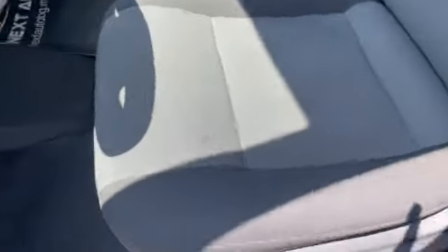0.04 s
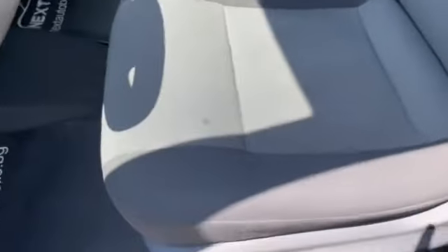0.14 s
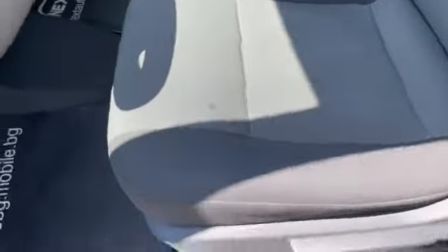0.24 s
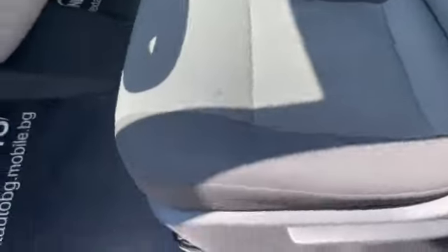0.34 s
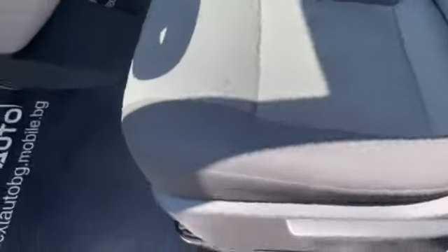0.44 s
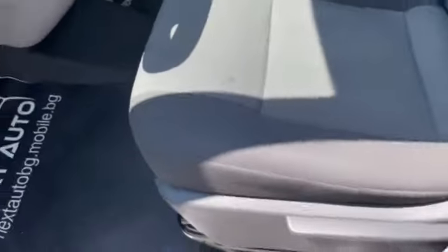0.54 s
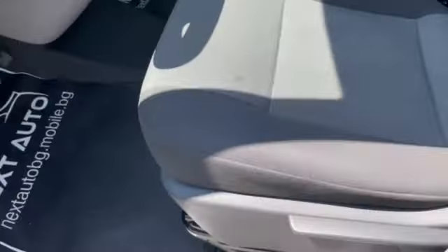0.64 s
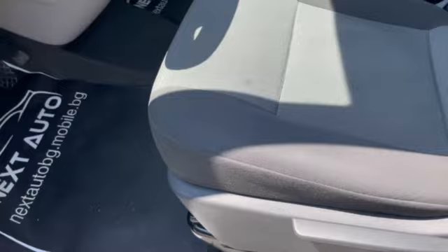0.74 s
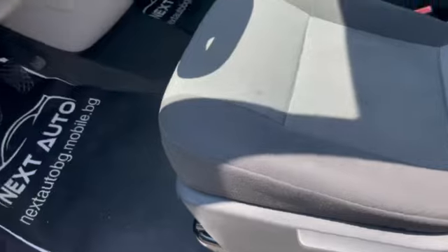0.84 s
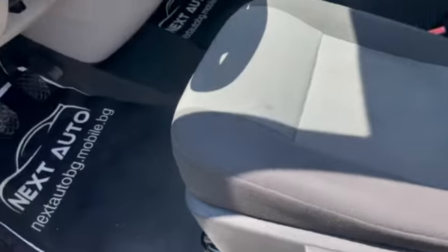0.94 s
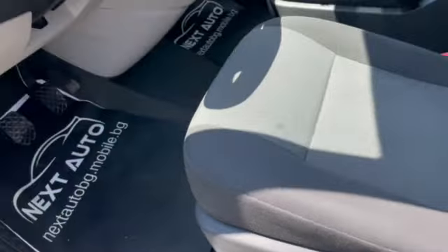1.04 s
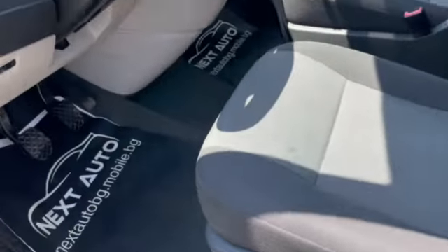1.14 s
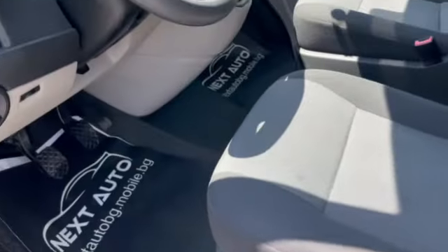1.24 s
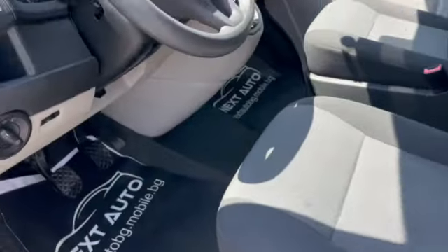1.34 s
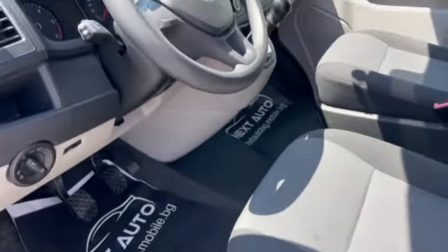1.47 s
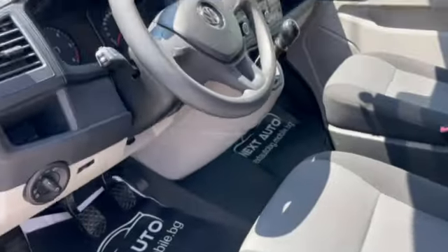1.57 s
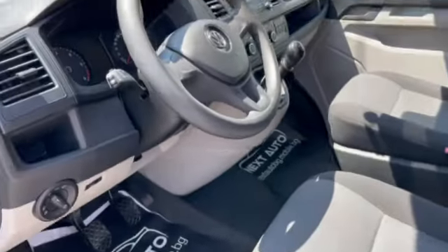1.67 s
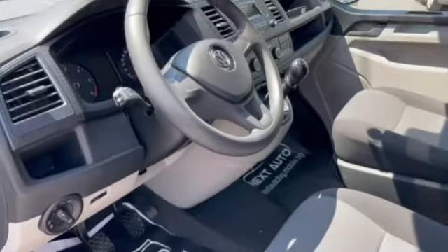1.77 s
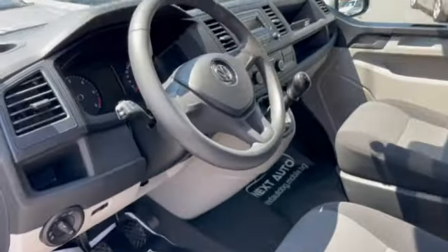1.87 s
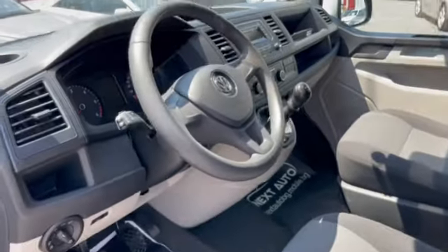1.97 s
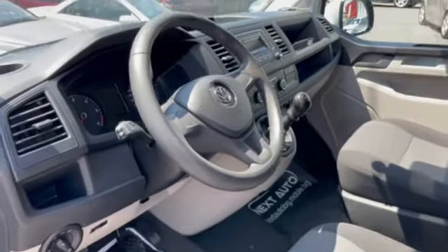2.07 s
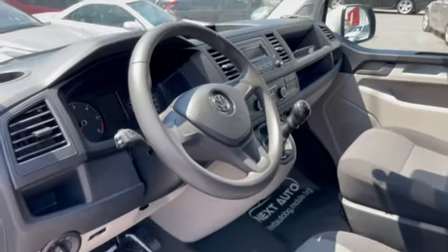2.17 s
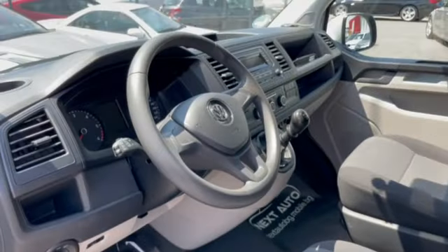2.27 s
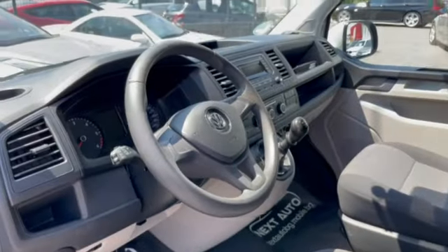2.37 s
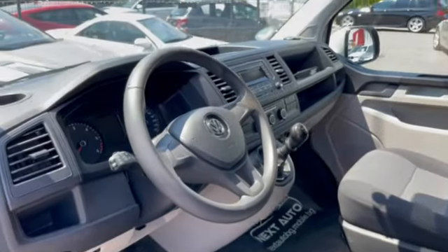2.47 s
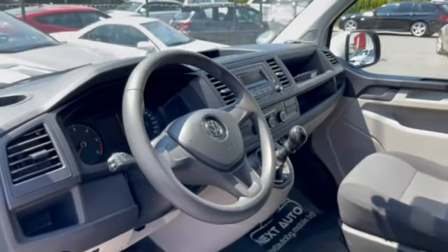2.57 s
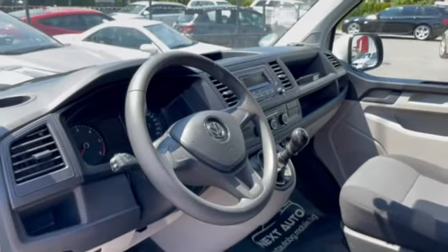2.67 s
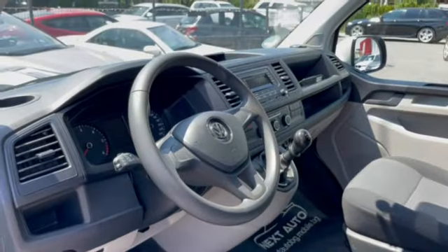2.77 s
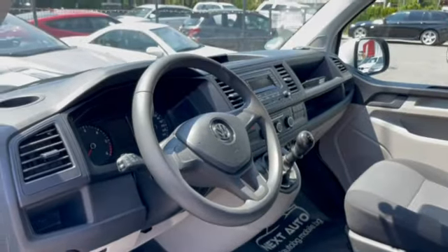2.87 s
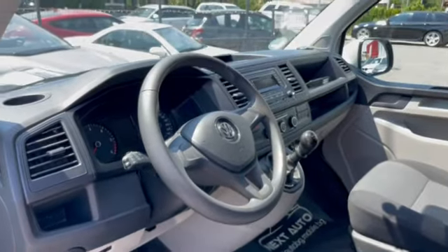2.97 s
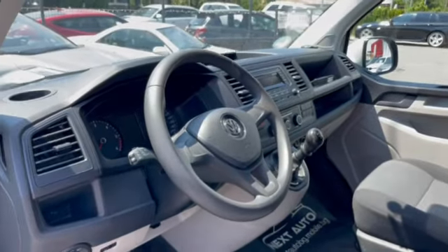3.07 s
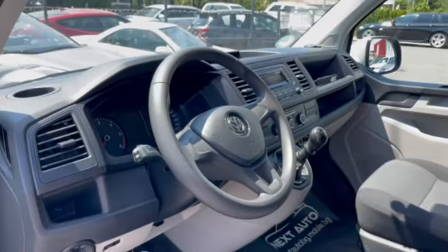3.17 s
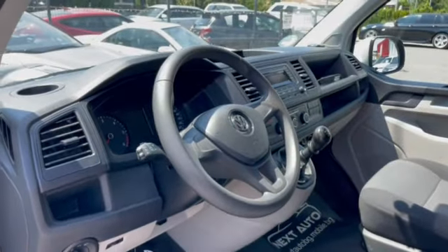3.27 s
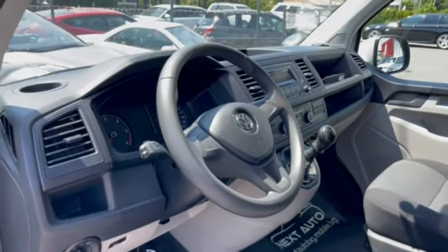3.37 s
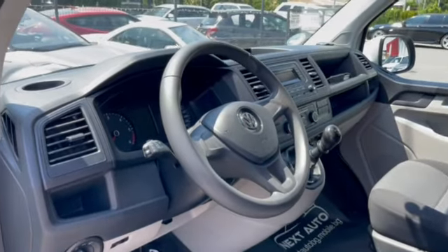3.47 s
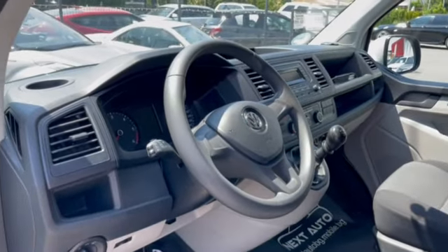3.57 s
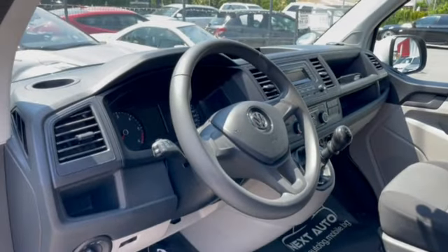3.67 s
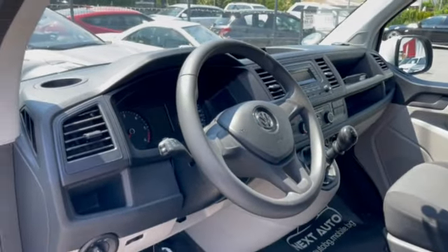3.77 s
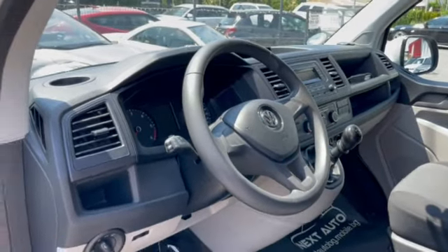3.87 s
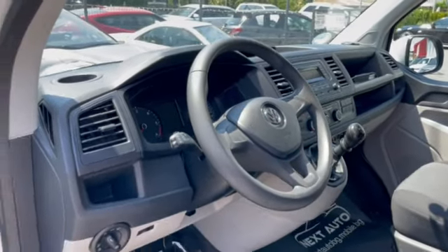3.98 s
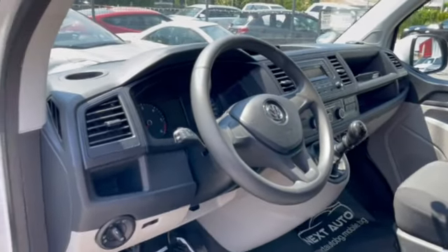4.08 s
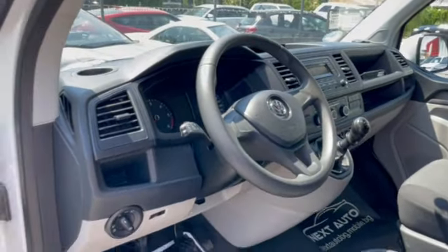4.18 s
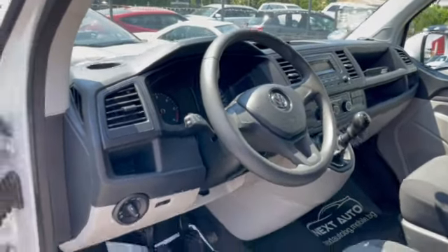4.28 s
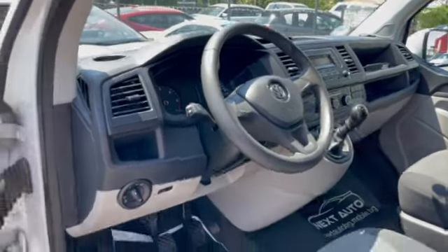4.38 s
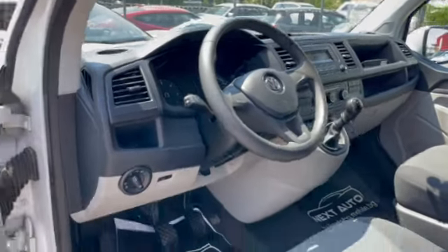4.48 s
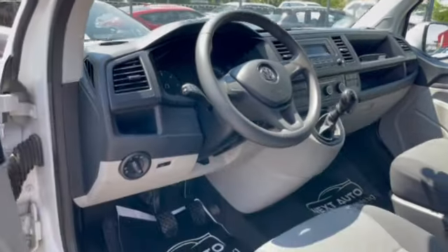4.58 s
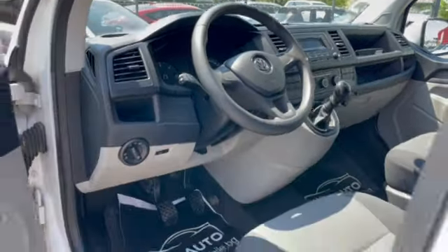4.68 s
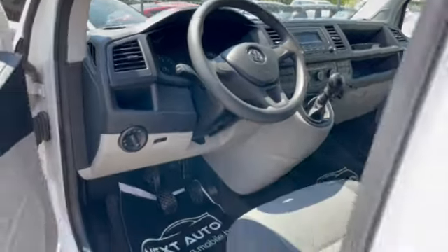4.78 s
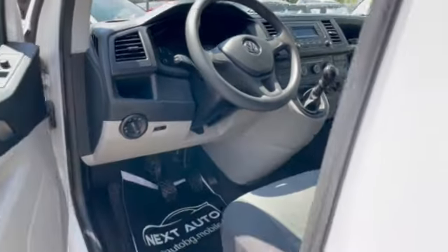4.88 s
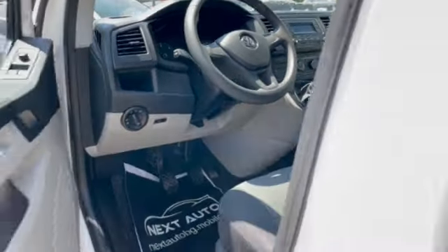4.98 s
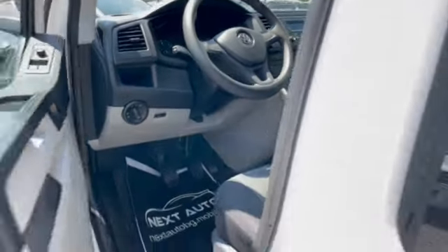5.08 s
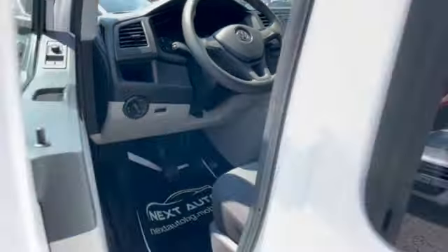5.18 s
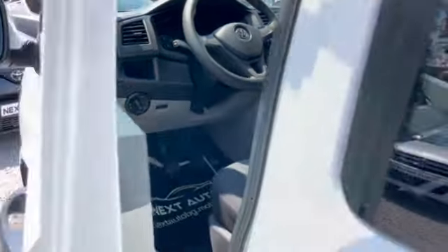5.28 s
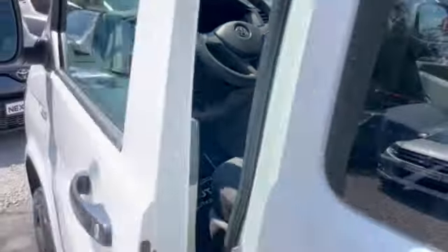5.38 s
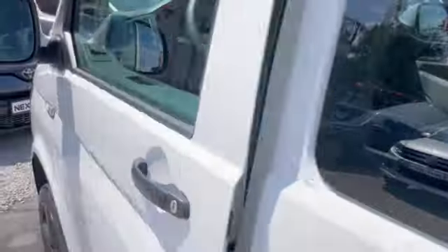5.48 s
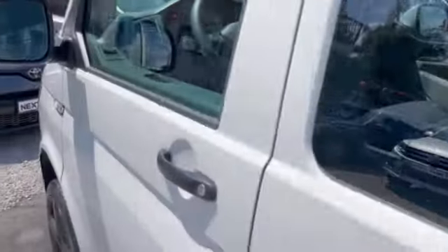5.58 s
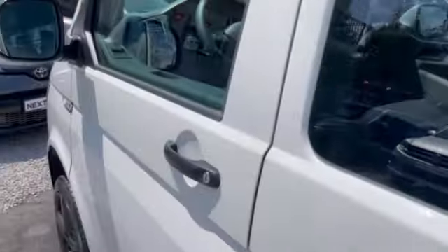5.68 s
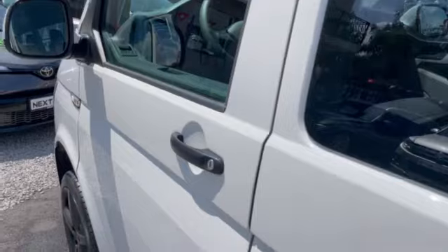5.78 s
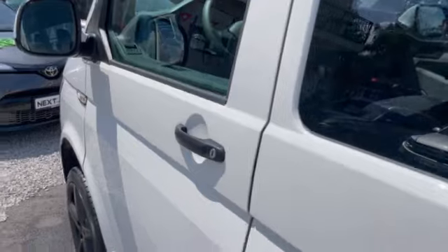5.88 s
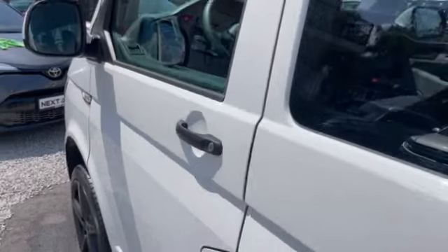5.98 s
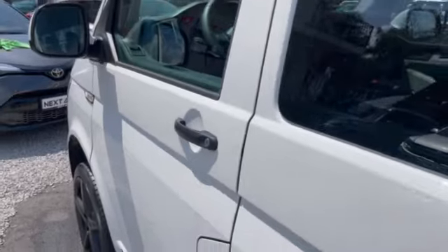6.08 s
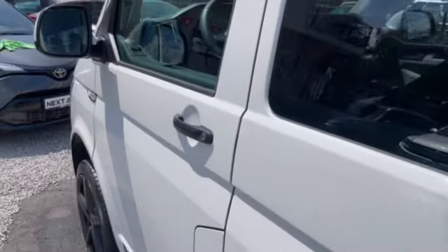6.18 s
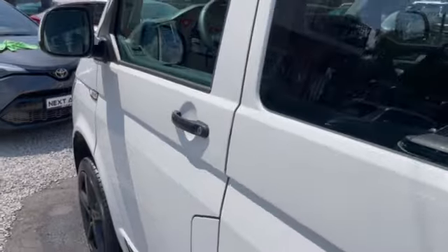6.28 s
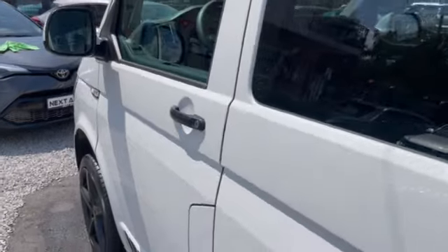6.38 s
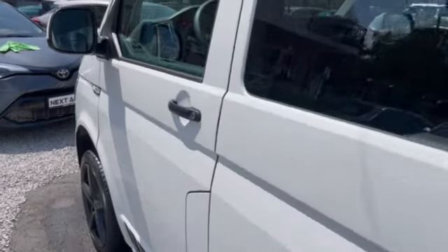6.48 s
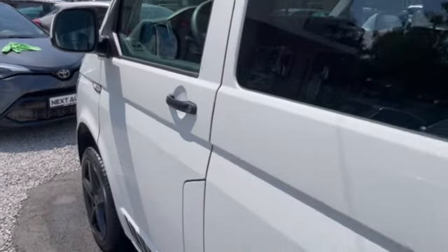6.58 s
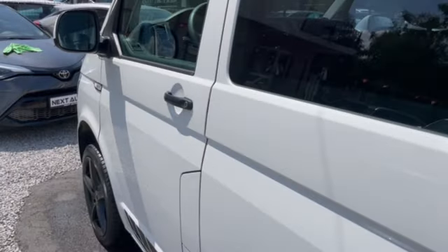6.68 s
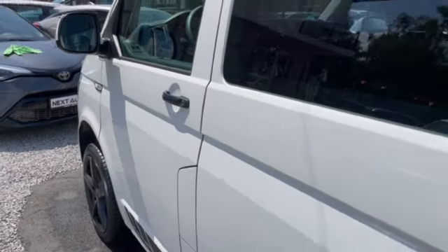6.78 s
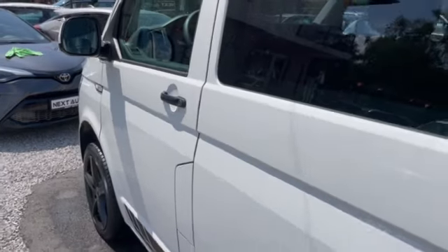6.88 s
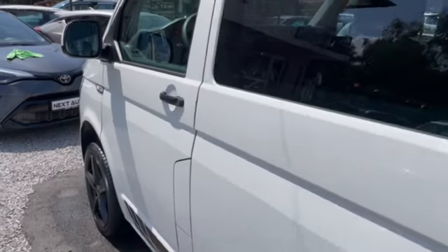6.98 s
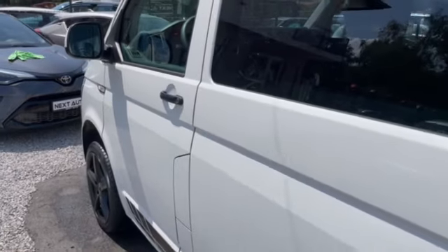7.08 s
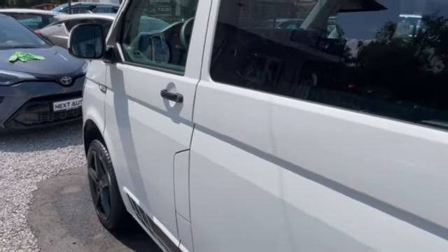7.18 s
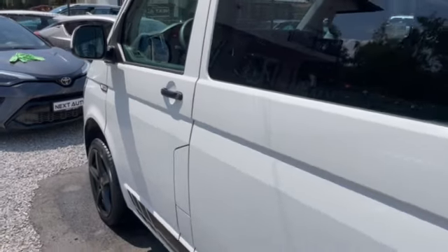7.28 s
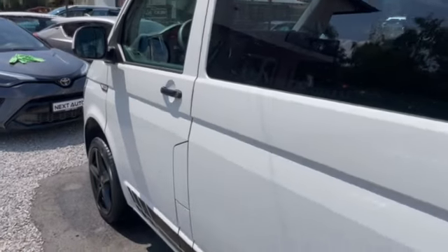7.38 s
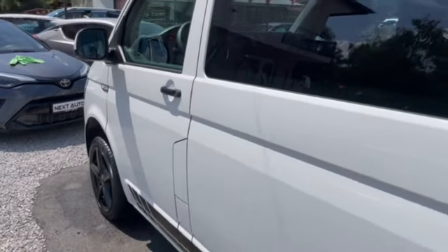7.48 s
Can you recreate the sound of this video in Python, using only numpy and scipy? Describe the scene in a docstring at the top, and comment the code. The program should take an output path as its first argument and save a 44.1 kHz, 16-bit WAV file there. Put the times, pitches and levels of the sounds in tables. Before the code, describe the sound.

Several seconds of quiet outdoor background, with distant road noise, a low engine hum and small dry handling taps. Wind bumps thicken on the microphone before a nearby van door shuts hard, metallic and hollow, its trim rattling briefly and the cabin booming. A crunchy step back on gravel follows, then a softer one, amid low puffing rumble. Open air, almost no echo.

```python
"""A van's driver's door slams on a gravel lot: latch, seals and one rebound, as rung modes and dying noise.
Two steps back scuff the gravel in showers of tiny pings; small knocks are damped rings with dry clicks.
Moving air buffets the microphone of a hand-held camera as low noise with swinging puffs.
Behind lie distant traffic, made of shaped noise, and two humming engines, made of sines."""
import sys
import numpy as np
from scipy import signal
from scipy.fft import rfft, irfft, next_fast_len
from scipy.io import wavfile
from scipy.ndimage import map_coordinates

SR = 44100
rng = np.random.default_rng(int(sys.argv[2]) if len(sys.argv) > 2 else 0)


def wav_record(signal):
    """Record a signal, one row per channel, as 16-bit PCM in the file named by sys.argv[1]."""
    frames = np.transpose(np.atleast_2d(signal))
    bounded = np.clip(frames, -1, 1)
    # unit amplitude maps onto the largest positive 16-bit level
    quanta = np.round(bounded * 32767).astype(np.int16)
    wavfile.write(sys.argv[1], SR, quanta)


N = 332073
LEFT_RIGHT = np.array([[0.5], [-0.5]])  # shares of a left-right difference


def amp(db):
    """Decibels to gain."""
    return np.exp(np.asarray(db) * (np.log(10) / 20))


def unit(x):
    """Scale to rms 1."""
    return x / np.sqrt(np.mean(x ** 2) + 1e-20)


def along(points, hz):
    """Read (frequency, value) points on a log frequency axis."""
    f, v = np.transpose(points)
    return np.interp(np.log(hz + 1), np.log(f + 1), v)


def curves(rows):
    """One value per sample for each column after the time."""
    s, *cols = np.transpose(rows)
    return [np.interp(np.arange(N) / SR, s, c) for c in cols]


def wobble(rate):
    """A smooth random curve with rate knots a second."""
    coarse = np.arange(0, N, 20)
    knots = rng.standard_normal(512)
    curve = map_coordinates(knots, [coarse * rate / SR], mode="wrap")
    return np.interp(np.arange(N), coarse, curve)


def filtered(x, response):
    """Multiply the spectrum of x by a response of frequency."""
    n = x.shape[-1]
    m = next_fast_len(n + 4096)
    return irfft(rfft(x, m) * response(np.fft.rfftfreq(m, 1 / SR)), m)[..., :n]


def add(track, s, sound):
    """Mix a sound into a track at time s."""
    start = round(s * SR)
    track[..., start:start + sound.shape[-1]] += sound[..., :N - start]


def widen(pair, side_db):
    """Two unrelated signals, as middle and side, become left and right with rms 1."""
    side = amp(side_db) * pair[1]
    return unit(np.array([pair[0] + side, pair[0] - side]))


def rush(spectrum, alike):
    """Steady stereo noise of rms 1 with a given left-right likeness."""
    def colour(hz):
        turn = np.arccos(np.clip(along(alike, hz), -1, 1)) / 2
        return amp(along(spectrum, hz)) * [np.cos(turn), np.sin(turn)]
    return widen(filtered(rng.standard_normal((2, N)), colour), 0)


def dying(noise, t60s):
    """Each frequency of a noise dies at its own speed."""
    hz, t, z = signal.stft(noise, SR, nperseg=128)
    decay = amp(-60 * t / along(t60s, hz)[:, None])
    return signal.istft(z * decay, SR, nperseg=128)[1][:, :noise.shape[-1]]


def ring(modes, t, scatter_db):
    """Sum damped modes, struck at slightly new strengths each time."""
    hz, db, t60 = np.transpose(modes)[:, :, None]
    sign = (-1) ** np.arange(len(hz))[:, None]
    level_db = db + scatter_db * rng.standard_normal(hz.shape) - 60 * t / t60
    return np.sum(sign * amp(level_db) * np.sin(2 * np.pi * hz * t), axis=0)


def pulse(colour):
    """One sharp causal pulse of peak 1 with a given spectrum."""
    size = 4096
    magnitude = np.maximum(colour(np.fft.rfftfreq(size, 1 / SR)), 1e-6)
    # folding the cepstrum forward gives minimum phase: the energy comes first
    cepstrum = irfft(np.log(magnitude))
    cepstrum[1:size // 2] *= 2
    cepstrum[size // 2 + 1:] = 0
    wave = irfft(np.exp(rfft(cepstrum)))
    return wave / np.abs(wave).max()


def smear(x, t60_s):
    """Two unrelated trails of dense, quickly dying copies of a sound."""
    trail = rng.standard_normal((2, len(x))) * amp(-60 * np.arange(len(x)) / SR / t60_s)
    return signal.fftconvolve(x[None], trail / np.linalg.norm(trail[0]), axes=1)[:, :len(x)]


# door contacts: (time [s], clatter drive [dB], clatter tilt [dB per octave], latch ring [dB],
# panel ring [dB], frame clonk [dB], lock plate [dB])
CONTACTS = [(5.529, -41, -2, -38.5, -49, -39, -42), (5.5391, -12.5, -4, -4, -21.5, -12, -33),
            (5.5446, -15.5, 0, -16.5, -28.5, -6, -19), (5.5549, -10.5, 0, -18, -25.5, -21.5, -16),
            (5.5606, -25, -3, -28.5, -21.5, -6, -25.5), (5.5656, -23, 9.5, -23.5, -31.5, -28, -30),
            (5.5695, -16.5, -3, -25, -26, -29.5, -23.5), (5.588, -16.5, 5, -28, -37, -30.5, -31),
            (5.5917, -17.5, -5.5, -22, -23.5, 2, -10), (5.6002, -23, -6.5, -41, -32, -13.5, -22),
            (5.638, -40.5, 4, -43, -47, -36.5, -43), (5.6443, -25.5, -0.5, -28, -28, -5.5, -28.5),
            (5.649, -32, -5.5, -43.5, -40, -18, -37)]
# loose trim and lock parts: (frequency [Hz], density [dB per Hz])
CLATTER_SPECTRUM = [(150, -23), (280, 4), (420, -0.5), (650, -6), (900, 1.5), (1200, -2), (1600, 2),
                    (2400, 0), (3100, -6), (5200, -10.5), (5600, -15.5), (7100, -16), (8300, -33.5),
                    (11000, -41.5), (15500, -60.5)]
# how long the trim rattles: (frequency [Hz], t60 [s])
CLATTER_T60 = [(200, 0.076), (450, 0.11), (800, 0.14), (2500, 0.081), (6000, 0.062), (12000, 0.066)]
# latch claw and striker: (frequency [Hz], level [dB], t60 [s])
LATCH_MODES = [(820, -13, 0.035), (2160, -15, 0.025), (2447, -1, 0.034), (2600, -10.5, 0.04),
               (3965, -15, 0.018), (4800, -16.5, .016), (5180, -17, 0.013), (6170, -22.5, 0.031),
               (6700, -21, 0.018)]
# lock plate: (frequency [Hz], level [dB], t60 [s])
LOCK_PLATE_MODES = [(1438, 1, 0.028), (1566, -4, 0.034), (1680, -9.5, .04), (1820, -17, 0.076),
                    (2090, -12.5, 0.041), (2410, -12, .04), (2950, -20.5, 0.037), (5320, -18.5, 0.033),
                    (5800, -20.5, .025)]
# sheet-steel door skin: (frequency [Hz], level [dB], t60 [s])
SKIN_MODES = [(146, -9.5, 0.31), (183.6, -8, 0.14), (240.3, 0, 0.4), (259, -5.5, 0.64), (301, -7.5, 0.35),
              (354, -12, 0.27), (395, -8.5, 0.42), (440.6, -19, 0.28), (582, -8, 0.18), (623, -1, 0.16),
              (784, -2.5, 0.14), (969, -4, 0.12), (1033, -14.5, 0.18), (1265, -6.5, 0.12)]
# stiff door frame: (frequency [Hz], level [dB], t60 [s])
FRAME_MODES = [(383, 5, 0.018), (632, -11, 0.041), (1212, -22, 0.027), (2350, -30.5, 0.044)]
CRACK_DB = -3  # first pulse of a contact, against its clatter drive


def door_contacts():
    """Each contact cracks, rattles the trim and rings latch, lock plate, skin and frame."""
    out, t = np.zeros((2, N)), np.arange(SR * 3 // 4) / SR
    for s, clatter_db, tilt_db, latch_db, panel_db, frame_db, plate_db in CONTACTS:
        colour = lambda hz: amp(along(CLATTER_SPECTRUM, hz) + tilt_db * np.log2((hz + 100) / 1500))
        noise = filtered(rng.standard_normal((2, len(t))), colour)
        clatter = 0.8 * dying(widen(noise, side_db=-6.0), CLATTER_T60)
        latch = ring(LATCH_MODES, t, scatter_db=1.5)
        plate = ring(LOCK_PLATE_MODES, t, scatter_db=1)
        skin = ring(SKIN_MODES, t, scatter_db=1.5)
        frame = ring(FRAME_MODES, t, scatter_db=1)
        hard = amp(clatter_db) * clatter + amp(latch_db) * latch + amp(plate_db) * plate
        hard = hard * (1 - np.exp(-(t / 0.00024) ** 2))
        steel = amp(panel_db) * skin + amp(frame_db) * frame
        steel = steel * (1 - np.exp(-t / 0.002))  # rubber seals soften the blow
        add(out, s, hard + steel)
        add(out, s, amp(clatter_db + CRACK_DB) * pulse(colour))
    return out


# the door lands on its seals and pushes air against the cabin: (time [s], level [dB])
THUDS = [(5.54, -10), (5.5634, -5), (5.5949, -4.5), (5.636, -16), (5.691, -14.5)]
# air and body shell of the cabin: (frequency [Hz], level [dB], t60 [s])
CABIN_MODES = [(51.4, -12, 0.36), (81.8, -0.5, 0.17), (86, -6.5, 0.31), (120, 1, 0.067),
               (151, -10.5, 0.028)]


def cabin_thuds():
    """Air pushed in by the landing door excites the low modes of the cabin."""
    out, t = np.zeros((2, N)), np.arange(SR * 3 // 4) / SR
    for s, db in THUDS:
        cabin = ring(CABIN_MODES, t, scatter_db=1)
        add(out, s, amp(db) * cabin * (1 - np.exp(-t / 0.0046)))
    return out


# stereo balance of the door: (frequency [Hz], left-right difference [dB])
DOOR_BALANCE = [(110, 2), (200, -2), (380, 2.5), (700, -4), (1290, -3), (2380, -2.5), (4400, 4.5),
                (8120, -1.5)]
# stereo phase of the door: (frequency [Hz], lead of the left [rad])
DOOR_PHASE = [(200, -0.078), (1500, -0.13), (2450, 0.75), (3400, 0.97), (5400, 0.52), (6900, 1),
              (8000, -0.28)]


def door():
    """Contacts and thuds reach the two microphone ports with different level and phase."""
    def port(hz):
        level = amp(along(DOOR_BALANCE, hz) * LEFT_RIGHT)
        return level * np.exp(1j * LEFT_RIGHT * along(DOOR_PHASE, hz))
    return filtered(door_contacts() + cabin_thuds(), port)


BOOM_DB, BOOM_RISE_S, BOOM_T60_S = -18, 0.05, 0.42


def boom():
    """The hardest thud sets the whole body booming: low diffuse noise that swells and dies."""
    start = max(THUDS, key=lambda thud: thud[1])[0]
    t = np.maximum(np.arange(N) / SR - start, 0)
    envelope = amp(BOOM_DB - 60 * t / BOOM_T60_S) * (1 - np.exp(-t / BOOM_RISE_S))
    return envelope * rush(DRONE_SPECTRUM, ALIKE)


def stones(size, spectrum, rate, t60_s):
    """A shower of tiny collisions of unequal strength, each ringing at its own pitch."""
    t = np.arange(int(t60_s * SR)) / SR
    when, pitch, strength = rng.random((int(rate * size / SR), 3)).T[:, :, None]
    hz = spectrum[0][0] + pitch * (spectrum[-1][0] - spectrum[0][0])
    level = amp(along(spectrum, hz) + 18 * strength - 60 * t / t60_s)
    pings = level * np.sin(2 * np.pi * hz * t) * (1 - np.exp(-t * hz))
    places = (when * size).astype(int) + np.arange(len(t))
    return np.bincount(places.ravel(), pings.ravel(), size)[:size]


# shoes grind on gravel: (time of greatest pressure [s], rise [s], fall [s],
# stone crunch [dB], grit before its lift [dB])
SCUFFS = [(4.149, 0.0091, 0.015, -46.5, -83), (6.497, 0.0094, 0.0063, -38.5, -41),
          (6.55, 0.036, 0.018, -47, -56.5), (6.598, 0.012, .02, -40, -56),
          (7.203, 0.011, 0.028, -46.5, -47.5), (7.287, 0.01, 0.022, -52, -55.5),
          (7.349, .03, 0.036, -50.5, -68), (7.512, .022, 0.0086, -71, -50.5)]
# larger stones: (frequency [Hz], density [dB per Hz])
CRUNCH_SPECTRUM = [(350, 9), (900, 9), (1550, 4.5), (2400, -14.5), (3600, -11.5)]
# fine grit: (frequency [Hz], density [dB per Hz])
GRIT_SPECTRUM = [(1200, 11), (2800, 8), (4200, -5), (5300, 13.5), (5600, -5), (6600, 11), (7200, 6.5),
                 (7600, -3.5), (8500, -7.5), (9600, -5.5), (11800, -8), (13500, -26)]
STONES_PER_S, STONE_T60_S = 2200, 0.009
GRIT_PER_S, GRIT_T60_S, GRIT_LIFT_DB = 14000, 0.003, 2.5


def steps():
    """Shoe pressure swells and eases, knocking larger stones together and sweeping fine grit."""
    out = np.zeros((2, N))
    for s, rise_s, fall_s, crunch_db, grit_db in SCUFFS:
        t = np.arange(-SR // 8, SR // 8) / SR
        pressure = np.exp(-0.5 * (t / np.where(t < 0, rise_s, fall_s)) ** 2)
        large = [stones(len(t), CRUNCH_SPECTRUM, STONES_PER_S, STONE_T60_S) for _ in range(2)]
        fine = [stones(len(t), GRIT_SPECTRUM, GRIT_PER_S, GRIT_T60_S) for _ in range(2)]
        crunch = amp(crunch_db) * widen(large, side_db=1.0)
        grit = amp(grit_db + GRIT_LIFT_DB) * widen(fine, side_db=1.0)
        add(out, s + t[0], pressure * (crunch + grit))
    return out


# dry clack of a small contact: (frequency [Hz], density [dB per Hz])
CLACK_SPECTRUM = [(300, -10.5), (700, 5), (1300, 1), (1900, -2.5), (2800, -7.5), (4000, -15.5), (7000, -40),
                  (10000, -45), (15000, -94)]
# bright snap of a small contact: (frequency [Hz], density [dB per Hz])
SNAP_SPECTRUM = [(1500, -30), (3000, 6.5), (5000, 7.5), (7200, 0), (8300, -12.5), (11500, -16.5),
                 (13000, -37)]
THUD_DB, THUD_HZ = -11.5, 273  # dull body, against the ring
CHATTER_DB, CHATTER_T60_S = 2, 0.02
SCATTER_DB, SCATTER_T60_S = -2, 0.05  # reflections from surfaces close by


def small_contacts(rows):
    """A damped ring and thud, with a clack and snap that chatter, scattered by near surfaces."""
    clack = pulse(lambda hz: amp(along(CLACK_SPECTRUM, hz)))
    snap = pulse(lambda hz: amp(along(SNAP_SPECTRUM, hz)))
    out, t = np.zeros((2, N)), np.arange(len(clack)) / SR

    def swing(hz, cycles):
        """A sine whose envelope peaks at 1 after the given cycles."""
        age = t * hz / cycles
        return age * np.exp(1 - age) * np.sin(2 * np.pi * hz * t)

    for s, ring_db, ring_hz, cycles, clack_db, snap_db, pan_db in rows:
        click = amp(clack_db) * clack + amp(snap_db) * snap
        chatter = amp(CHATTER_DB) * smear(click, CHATTER_T60_S)[0]
        body = swing(ring_hz, cycles) + amp(THUD_DB) * swing(THUD_HZ, 0.4)
        hit = amp(ring_db) * body + click + chatter
        scatter = amp(SCATTER_DB) * smear(hit, SCATTER_T60_S)
        add(out, s, amp(pan_db * LEFT_RIGHT) * (hit + scatter))
    return out


# single pebbles: (time [s], ring [dB], ring frequency [Hz], cycles until the ring peaks [cycles],
# clack [dB], snap [dB], left-right difference [dB])
PEBBLES = [(6.479, -37, 1180, 0.69, -44, -45, 7), (6.495, -33, 1730, 1.2, -48, -40, 3),
           (6.503, -28, 1520, 0.51, -51, -40, 0), (6.511, -30, 710, 0.33, -47, -52, 5),
           (6.536, -35, 1330, .7, -47, -50, 2), (6.556, -35, 910, 0.63, -46, -47, 7),
           (6.566, -40, 1500, 1.2, -50, -51, 2), (6.585, -36, 1130, 0.76, -49, -56, 3),
           (6.597, -28, 1210, 0.98, -46, -50, -2), (6.611, -33, 1270, 0.65, -40, -46, -2),
           (6.627, -38.5, 1080, 0.84, -48, -55, 5), (6.691, -48, 1300, 0.66, -52, -47, 8),
           (7.171, -41, 1700, 0.89, -48, -48, 6), (7.183, -40, 1490, 1.6, -50, -55, 3),
           (7.222, -44, 1300, 0.69, -39, -40, 4), (7.242, -40, 1390, 0.91, -45, -52, 3),
           (7.28, -52, 1100, 1, -37, -43, 5), (7.324, -47, 990, 1, -37, -52, 5),
           (7.401, -56, 1400, 0.69, -41, -50, 5), (7.496, -57, 1470, .8, -52, -54, 6),
           (7.514, -49, 1800, .8, -56, -43.5, 4)]


def pebbles():
    """Single pebbles snap out from under the sole, each a short ring and click."""
    return small_contacts(PEBBLES)


# light knocks and handling clicks: (time [s], ring [dB], ring frequency [Hz],
# cycles until the ring peaks [cycles], clack [dB], snap [dB], left-right difference [dB])
KNOCKS = [(.133, -57, 660, .5, -52, -59, 13), (.2445, -51, 1170, 0.95, -33.5, -51, 4),
          (.285, -41, 730, .5, -45, -59, 8), (.297, -47, 910, 0.71, -48, -57, 10),
          (.578, -40.5, 740, 0.71, -49, -66, 4), (1.306, -41.5, 590, 0.53, -48, -73, 11),
          (1.5805, -45, 1003, 0.84, -33.5, -50, 3), (1.685, -33, 620, 0.77, -46, -60, 3),
          (1.7285, -28, 1480, 0.43, -35, -43, 5), (1.792, -53, 930, 0.55, -38.5, -51.5, 9),
          (1.853, -43, 1580, 1.1, -49, -61, 12), (1.857, -40, 620, .7, -58, -68, -3),
          (2.2085, -27.5, 900, 0.55, -33, -45, 6), (2.209, -28, 1700, 1.1, -40, -54, 0),
          (2.2185, -34.5, 830, 0.51, -39, -46, -6), (2.225, -36, 634, 0.82, -28.5, -41, 4),
          (2.2495, -37, 660, 0.7, -48, -51, 11), (2.978, -41, 734, 1, -47, -58, 9),
          (3.0035, -31.5, 670, 0.44, -49, -58, 2), (3.012, -42, 770, 0.56, -50, -62, 1),
          (3.0575, -39, 730, .9, -55, -58.5, 12), (4.086, -42.5, 1030, 0.75, -44.5, -63, -3),
          (4.125, -41, 910, 0.87, -59, -69, 7.5), (4.572, -35, 700, 0.65, -46, -62, -6.5),
          (4.5985, -29, 900, 0.47, -28.5, -41, -5), (4.6025, -29, 900, 0.31, -35.5, -43, 1.5),
          (4.727, -41, 880, 0.47, -50, -63, 5), (6.715, -39, 930, 0.82, -43, -60, 0),
          (6.811, -32, 650, 1.06, -50, -51, 1)]


def knocks():
    """Small knocks and handling clicks, each a short ring and click."""
    return small_contacts(KNOCKS)


def grains(spectrum, rate, side_db):
    """Clicks of very unequal size over faint noise, rms 1."""
    clicks = (rng.random((2, N)) < rate / SR) * rng.standard_normal((2, N))
    clicks = clicks + 0.076 * rng.standard_normal((2, N))
    return widen(filtered(clicks, lambda hz: amp(along(spectrum, hz))), side_db)


# light rubbing around the clicks: (time [s], half length [s], level [dB])
RUBS = [(0.572, 0.033, -57.5), (1.715, 0.061, -56.5), (2.188, 0.016, -51)]
# rubbing surfaces: (frequency [Hz], density [dB per Hz])
RUB_SPECTRUM = [(400, -9), (1550, 2), (1900, 5), (2200, -6), (9000, -45.5), (15000, -75)]


def rubs():
    """Surfaces slide over each other in tiny slips as the pressure swells and eases."""
    t = np.arange(N) / SR
    pressure = sum(amp(db) * np.exp(-0.5 * ((t - s) / half) ** 2) for s, half, db in RUBS)
    return pressure * grains(RUB_SPECTRUM, rate=310, side_db=-2.0)


# weak answer of the lot: (frequency [Hz], t60 [s])
YARD_T60 = [(100, 0.98), (400, 0.53), (1000, 0.12), (3000, 0.099), (10000, 0.093)]


def yard(x):
    """Parked cars and walls answer 10 ms later with a diffuse tail."""
    tail = dying(rng.standard_normal((2, SR * 3 // 4)), YARD_T60)
    tail = np.pad(tail / np.linalg.norm(tail[0]), ((0, 0), (SR // 100, 0)))
    return signal.fftconvolve(x, tail, axes=1)[:, :N]


# air moving past the microphone: (time [s], rumble before its lift [dB])
AIR = [(0, -49.5), (.4, -44), (3.8, -45), (4.6, -35.5), (5.0, -36), (5.4, -25.5), (6.05, -29),
       (6.35, -32.5), (6.6, -38), (7.1, -30), (7.26, -26.5), (7.4, -45)]
# rumble of that air: (frequency [Hz], density [dB per Hz])
RUMBLE_SPECTRUM = [(11, -10), (18, -26), (45, 2), (65, 5.5), (77, 3), (112, -6.5), (140, -10.5), (172, -24),
                   (347, -37), (400, -37), (520, -107), (880, -120)]
# soft bumps of handling and air on the microphone: (time [s], drive [dB], frequency [Hz])
PUFFS = [(2.999, -28, 80), (3.044, -25.5, 68), (3.841, -27, 133), (4.151, -36.5, 290), (4.587, -22, 83.5),
         (4.728, -29.5, 151), (5.054, -24, 125), (5.122, -17, 87), (5.21, -16.5, 138), (5.228, -21.5, 148),
         (5.302, -18, 88), (5.399, -15, 97), (5.458, -16.5, 108), (5.772, -13.5, 72), (5.866, -24, 66),
         (6.041, -21, 75), (6.14, -26, 139), (6.205, -26.5, 178), (6.256, -20.5, 131), (6.901, -18.5, 138),
         (6.922, -17.5, 122), (7.192, -19, 227), (7.197, -11, 101), (7.21, -15, 110), (7.248, -11.5, 70),
         (7.304, -24, 147)]


def wind():
    """Low rumble on the microphone, with bumps and puffs that swing for a few cycles."""
    [rumble_db] = curves(AIR)
    alike = [(60, 0.91), (200, 0.44)]  # (frequency [Hz], left-right likeness)
    rumble = amp(rumble_db + 1.5) * rush(RUMBLE_SPECTRUM, alike)
    puffs, t = np.zeros((2, N)), np.arange(SR // 4) / SR
    for s, db, puff_hz in PUFFS:
        swing = np.sin(2 * np.pi * puff_hz * t)
        colour = lambda hz: hz / (1 + (hz / (1.37 * puff_hz)) ** 5)
        eddies = widen(filtered(rng.standard_normal((2, len(t))), colour), side_db=-10.0)
        envelope = amp(db + 0.5 - 60 * t / 0.083) * (1 - np.exp(-t / 0.0035))
        add(puffs, s, envelope * (0.68 * swing + 1.016 * eddies))
    return rumble + puffs


# road noise, louder away from the open cabin: (time [s], tyre hiss before lift and drift [dB])
LOT = [(0, -53), (1.2, -53), (1.7, -51), (2.6, -52), (3.6, -52), (4.8, -53.5), (5.3, -49.5), (5.9, -48),
       (7.3, -47), (7.53, -48)]
# tyre hiss: (frequency [Hz], density [dB per Hz])
HISS_SPECTRUM = [(200, 3), (500, 3), (900, 3), (1500, -2), (2400, -9.5), (3200, -15), (3700, -18.5),
                 (4700, -23), (5300, -22), (5700, -26.5), (6600, -27), (7200, -33.5), (8500, -44),
                 (15000, -64.5)]
# low drone, also the colour of the boom: (frequency [Hz], density [dB per Hz])
DRONE_SPECTRUM = [(60, -4.5), (118, 6), (130, 3.5), (147, 7), (195, -0.5), (215, 4), (240, 4), (258, 3),
                  (300, -1.5), (380, -5), (550, -17), (1000, -72)]
# stereo width of hiss, drone and boom: (frequency [Hz], left-right likeness [-1 to 1])
ALIKE = [(130, 1), (290, 0.52), (640, -0.28), (1410, -0.32), (3100, 0.26), (7000, -0.092)]
DRONE_DB, DRONE_PER_AIR = -51.5, 0.53  # drone in calm air; dB gained for each dB of rumble
CALM_DB = -42.5  # calm air, on the scale of the air table


def traffic():
    """Far road noise: the hiss of tyres and a low drone that swells with the moving air."""
    [hiss_db] = curves(LOT)
    [rumble_db] = curves(AIR)
    drone_db = DRONE_DB + DRONE_PER_AIR * (rumble_db - CALM_DB) + 0.38 * wobble(3.0)
    drone = amp(drone_db) * rush(DRONE_SPECTRUM, ALIKE)
    drift_db = 0.35 * wobble(7)
    return drone + amp(hiss_db + 1.5 + drift_db) * rush(HISS_SPECTRUM, ALIKE)


# a car engine nearby: (time [s], mean firing rate [Hz], level before the multiples' levels [dB])
ENGINE = [(0, 83.05, -59), (.5, 82.72, -48.5), (1.3, 82.8, -49), (2.4, 85.5, -47.5), (3.1, 85.43, -61.5),
          (3.7, 84.2, -48.5), (4.7, 86.1, -50.5), (5.5, 86.8, -76.5)]
# its exhaust note: (multiple of the firing rate [count], level [dB])
EXHAUST = [(1, -2), (2, -6), (3, -9), (4, -8.5), (5, -14.5)]
WAVER_DB = 2


def engine():
    """An engine hums at multiples of its firing rate; each wavers on its own."""
    firing_hz, db = curves(ENGINE)
    phase = 2 * np.pi * np.cumsum(firing_hz * (1 + 0.00353 * wobble(5))) / SR
    hum = sum(amp(level + WAVER_DB * wobble(9.6)) * np.sin(k * phase) for k, level in EXHAUST)
    return np.sqrt(2) * amp(db) * hum


# a farther, deeper engine: (time [s], mean firing rate [Hz], mean level [dB])
DIESEL = [(0, 72, -55), (1.9, 78.28, -43.5), (2.8, 87, -43), (3.4, 81.23, -42.5), (4.05, 60.6, -39.5),
          (4.33, 61, -35.5), (4.38, 61.55, -31), (4.8, 66.57, -33.5), (5.3, 64, -56), (6.55, 57.77, -69.5),
          (6.78, 60, -34.5), (7.06, 61.77, -30.5), (7.3, 58.5, -63)]


def diesel():
    """A farther engine of which only the deep firing note carries; it drops and picks up again."""
    firing_hz, db = curves(DIESEL)
    phase = 2 * np.pi * np.cumsum(firing_hz * (1 + 0.012 * wobble(7.2))) / SR
    return np.sqrt(2) * amp(db + 2.1 * wobble(22)) * np.sin(phase)


def scene():
    """Door, knocks and pebbles with the answer of the lot, over the background."""
    hits = door() + knocks() + pebbles()
    near = hits + amp(-23.5) * yard(hits) + boom() + steps() + rubs()
    return near + wind() + traffic() + engine() + diesel()


TOP_HZ = 15800


def record(dry):
    """The camera rounds off the highest peaks and keeps nothing above its band limit."""
    rounded = dry / (1 + np.abs(dry) ** 8) ** (1 / 8)
    return filtered(rounded, lambda hz: hz < TOP_HZ)


dry = scene()
out = record(dry)
wav_record(out)
```